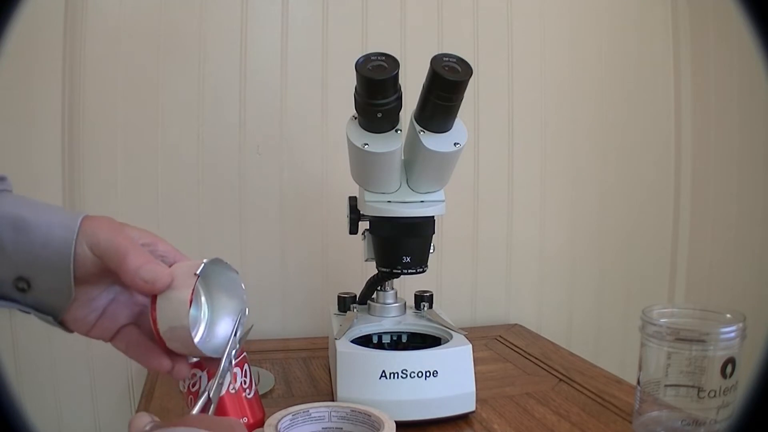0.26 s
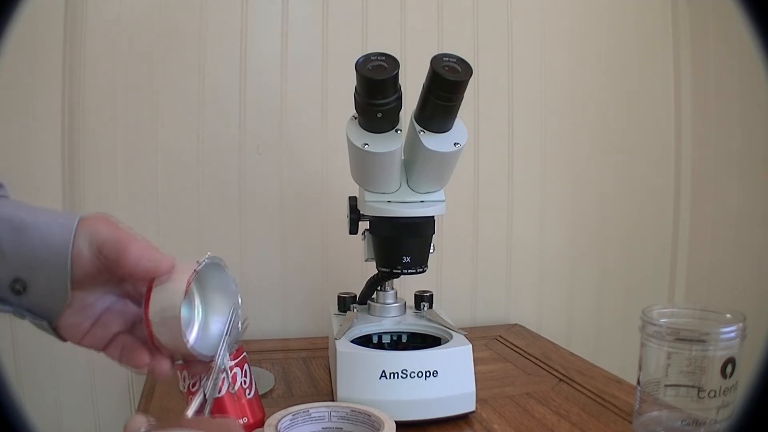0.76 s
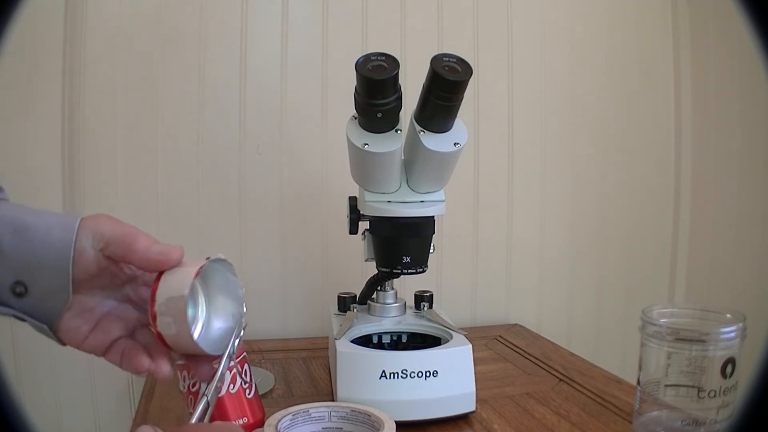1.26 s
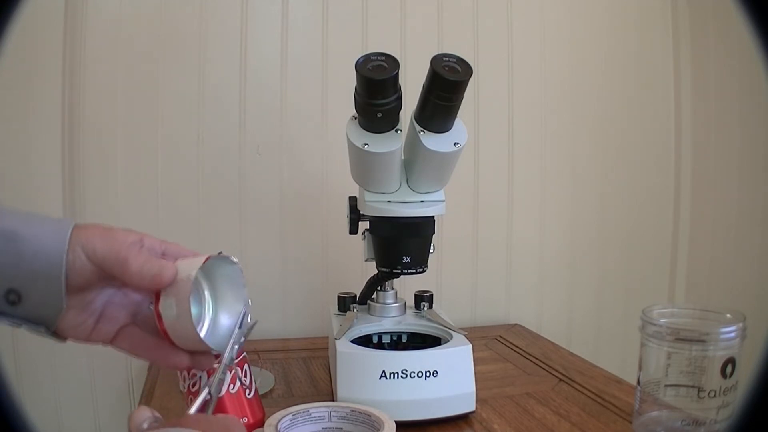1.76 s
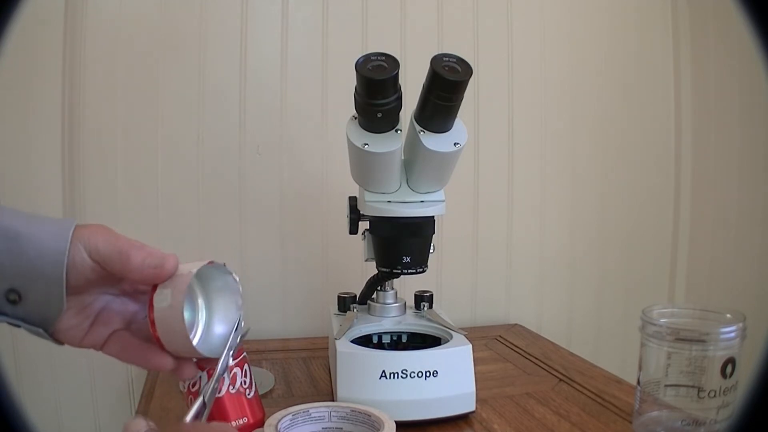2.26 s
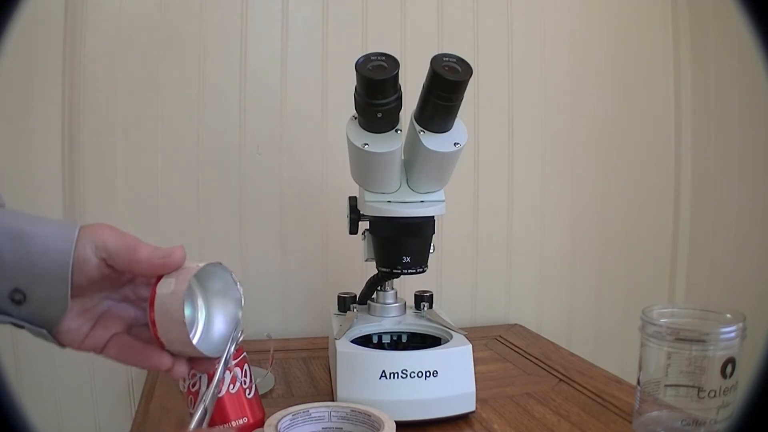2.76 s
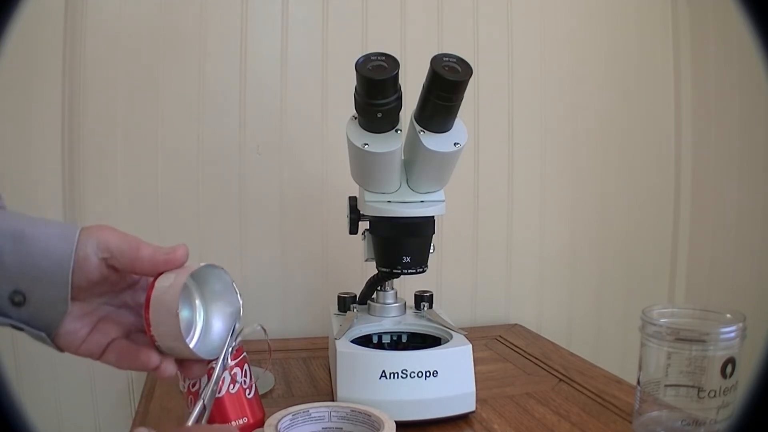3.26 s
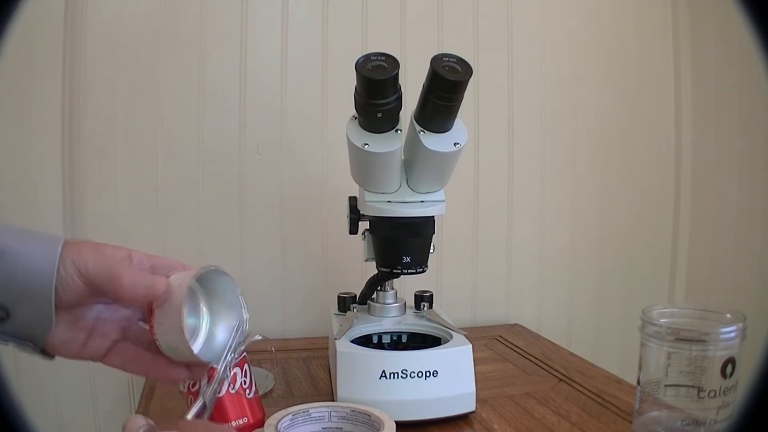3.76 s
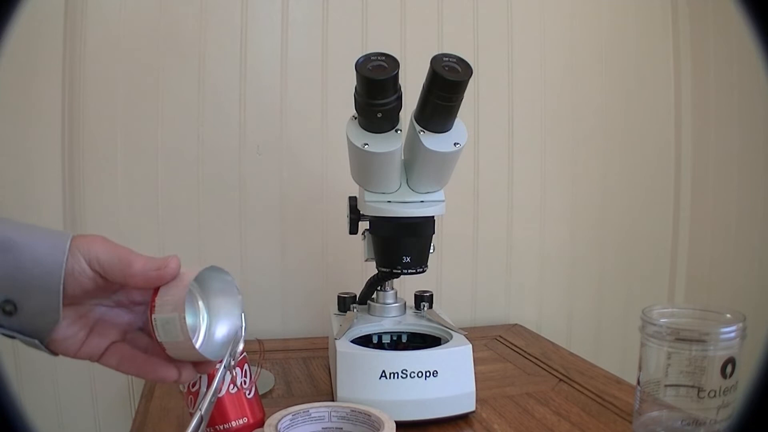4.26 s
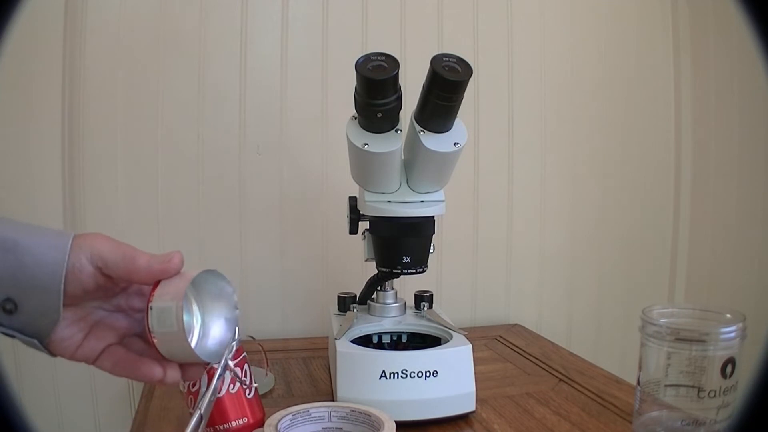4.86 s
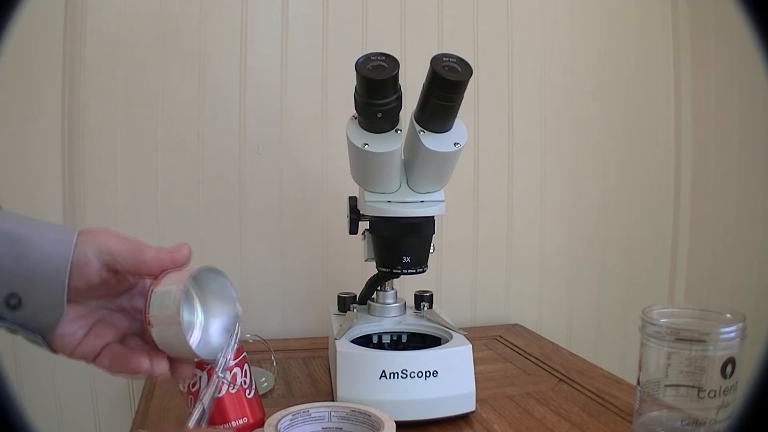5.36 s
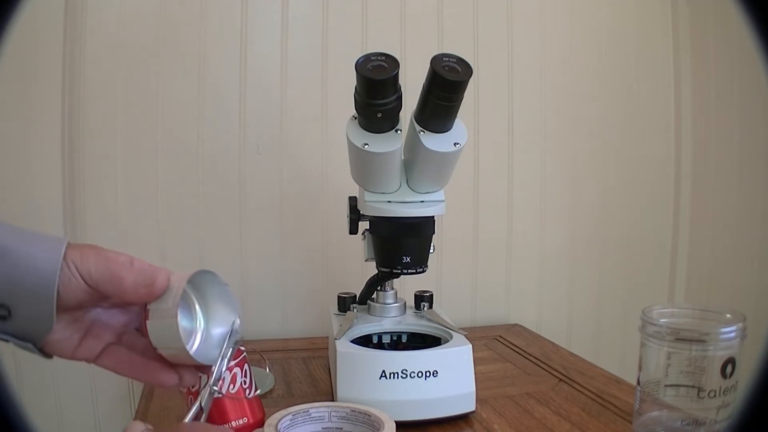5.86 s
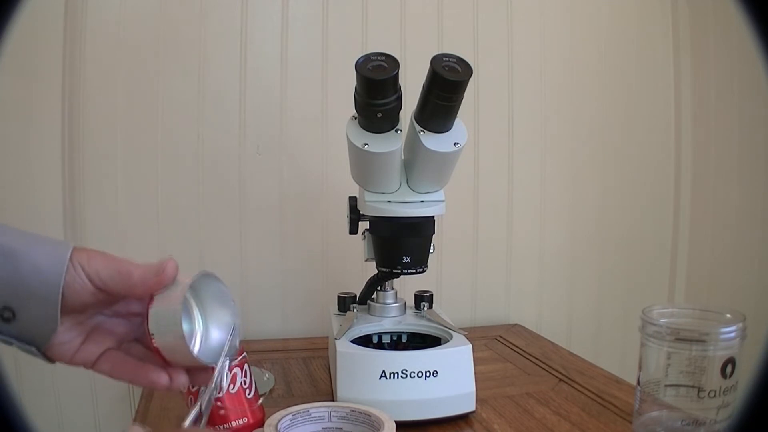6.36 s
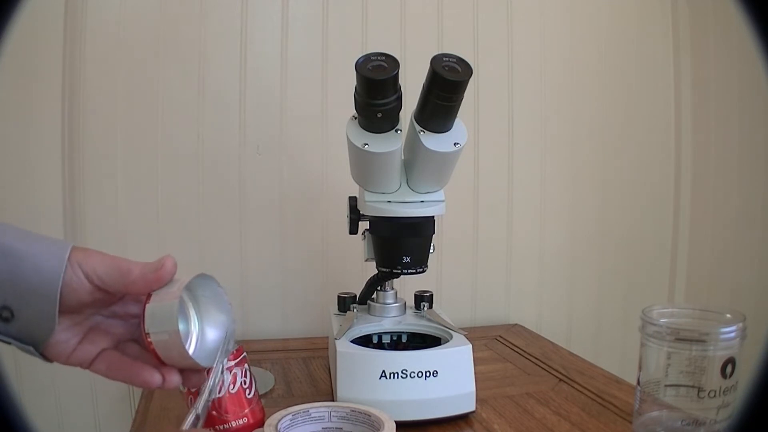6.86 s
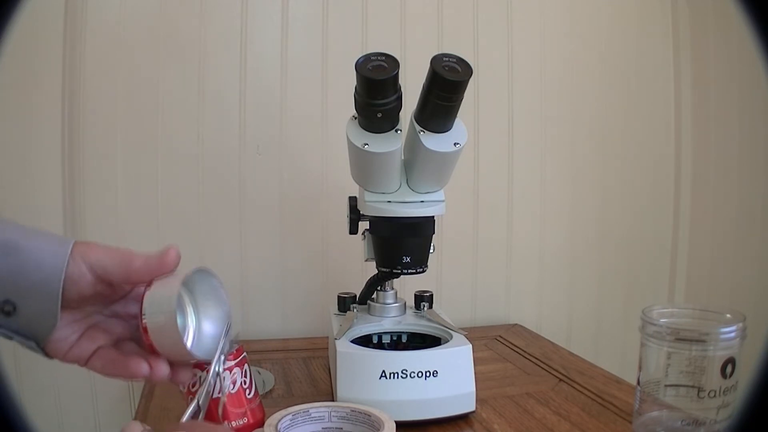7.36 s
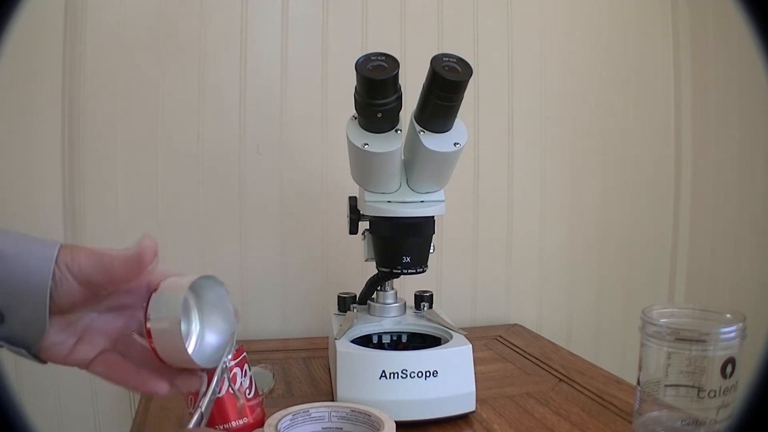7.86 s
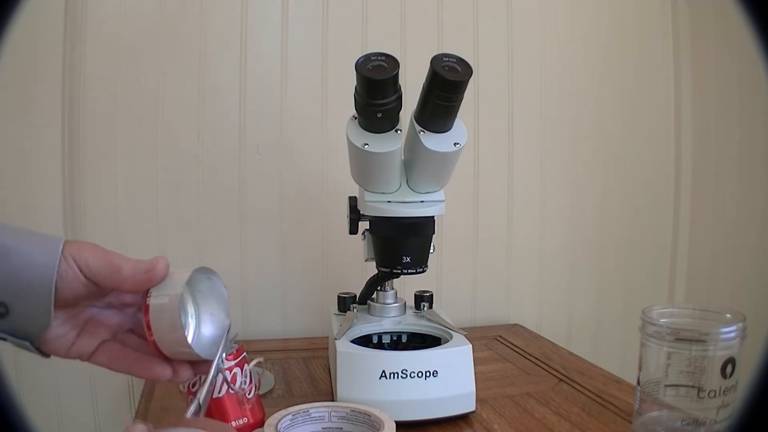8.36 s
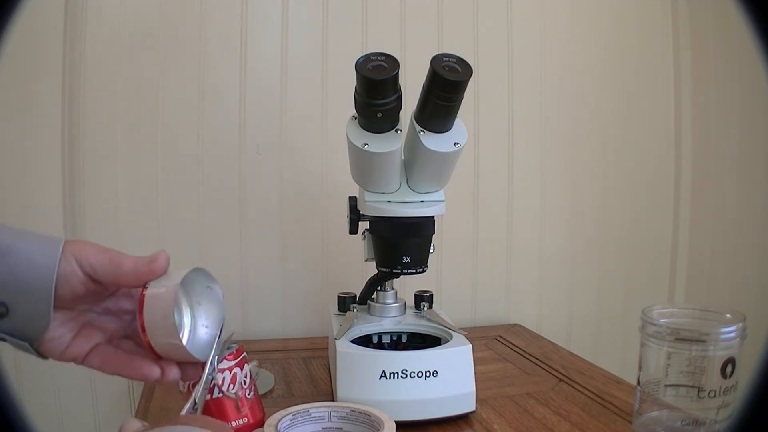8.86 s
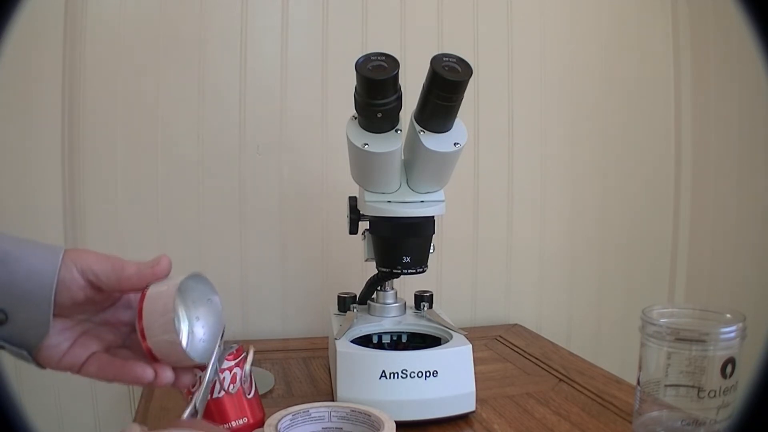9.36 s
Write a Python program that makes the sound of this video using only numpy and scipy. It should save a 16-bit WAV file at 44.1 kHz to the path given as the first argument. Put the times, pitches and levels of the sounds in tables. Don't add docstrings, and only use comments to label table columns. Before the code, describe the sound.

Regular metallic snips tear thin aluminium, the cup-shaped can ringing briefly, with blade scrapes, clicks and bright little snaps over faint hiss.

```python
import sys
import numpy as np
from scipy import signal
from scipy.fft import rfft, irfft
from scipy.io import wavfile
from scipy.ndimage import uniform_filter1d

SR = 44100
rng = np.random.default_rng(int(sys.argv[2]) if len(sys.argv) > 2 else 0)


def generate_wav(signal):
    frames = np.transpose(np.atleast_2d(signal))
    scaled = np.clip(frames, -1, 1) * 32767
    pcm = np.round(scaled).astype(np.int16)
    wavfile.write(sys.argv[1], SR, pcm)


def volts_from_db(level):
    exponent = np.asarray(level, float) / 20
    return 10 ** exponent


N = 423801

# bite_s, tear_length_s, end_force_db, bite_force_db (re end force), bent_mode_hz
CLOSING_STROKES = [(0.104, 0.026, -33.5, -5.5, 3230), (0.751, 0.0097, -27.5, -12, 3190),
                   (1.672, 0.04, -42.5, -6, 3730), (2.319, 0.011, -26.5, -10.5, 3460),
                   (2.938, 0.022, -40, -3, 3910), (3.762, 0.0068, -41, 11.5, 3680),
                   (4.392, 0.038, -41, -13.5, 3800), (4.999, 0.028, -34.5, -3, 3600),
                   (5.742, 0.042, -34, -21, 4060), (6.374, 0.065, -48, 4.5, 3860),
                   (6.975, 0.0021, -63.5, 22.5, 3950), (7.321, 0.017, -35, -18.5, 3940),
                   (8.092, 0.0026, -47.5, 7.5, 4270), (8.716, .014, -35.5, -13.5, 4020),
                   (9.344, 0.032, -44.5, -8.5, 4150)]
# start_s, length_s, start_force_db, end_force_db, bent_mode_hz
OPENING_RUBS = [(0.336, 0.052, -70, -70, 4030), (0.462, 0.16, -60, -69.5, 3880),
                (1.009, 0.25, -71.5, -68.5, 3950), (1.964, 0.052, -57.5, -67, 3720),
                (2.08, 0.1, -61, -57, 4020), (2.466, 0.35, -57.5, -65.5, 4010),
                (3.236, 0.35, -62, -74, 4060), (3.885, 0.073, -50, -80, 4000),
                (4.018, 0.16, -59, -61, 3580), (4.25, 0.042, -54, -55.5, 4900),
                (4.634, .21, -62, -62, 3660), (5.254, 0.17, -60.5, -59.5, 3720),
                (5.512, 0.17, -59, -80, 4070), (5.93, 0.13, -81, -56.5, 4060), (6.085, .04, -48, -62, 4070),
                (6.174, 0.036, -42, -59, 3830), (6.576, 0.086, -75, -64, 3900),
                (7.588, 0.027, -52.5, -71, 4170), (7.62, 0.22, -65, -72, 3960),
                (8.138, 0.15, -63, -75, 4020), (8.39, .22, -62, -73, 4180), (8.979, 0.19, -67.5, -65, 3970)]
# start_s, length_s, start_force_db, end_force_db, bent_mode_hz
TIP_SLIDES = [
    (3.72, 0.033, -83, -60, 3550),
    (6.985, 0.077, -46.5, -71, 3800),
    (7.215, 0.12, -85, -71, 4040),
    (8.052, 0.031, -72, -64, 3830),
]
# mode_hz, width_hz, level_db
CUP_MODES = [(665, 240, -33.5), (1126, 61, -4), (1564, 62, -2), (1660, 240, -5), (1900, 13, -6.5),
             (1954, 117, 6), (2345, 100, -6), (2810, 110, -13), (3420, 270, -7), (3660, 330, -8.5),
             (3989, 196, -2.5), (4390, 460, -9), (6190, 77, -17.5), (7110, 87, -24.5), (8154, 880, -8)]
# freq_hz, density_db (per Hz)
TEAR_COLOUR = [(150, -67), (250, -53.5), (669, -5.5), (1290, -11), (1890, 5.5), (2490, -9), (3280, -12.5),
               (8180, -25), (15500, -47.5)]
# time_s, blow_db, upper_modes_db (re blow), thin_tip_db (re blow)
BRIGHT_SNAPS = [(0.2404, -31, 0, -12), (1.3596, -39, -8, -14), (2.4772, -34.5, -2, -4),
                (2.5028, -27.5, -2, -12), (2.5112, -30.5, -2, -8), (2.5492, -36.5, -5, -8),
                (3.2874, -39, .5, -14), (3.3912, -35, -4, -10), (3.497, -33, -7, -12),
                (3.5199, -34.5, -6, -6), (3.552, -36, -7, -12), (3.7535, -14.5, 3.5, 2),
                (3.8468, -25, -6, -20), (3.872, -25, -19, -9), (4.284, -35.5, 1, -16),
                (5.5131, -30.5, -14, -20), (5.572, -36.5, -2, -1), (5.778, -18.5, -3, 4),
                (6.3734, -20.5, -15, -22), (6.9669, -15, 1.5, -22), (7.155, -45, 4, -18),
                (7.734, -37, -4, -16), (7.7544, -36.5, 5, -18), (7.852, -35, -8, -12),
                (7.9114, -35, -10, 3), (7.9592, -40.5, -9, -1), (8.0666, -43.5, 11, -18),
                (8.087, -11.5, -12.5, -8), (8.3945, -29.5, 0, -14), (8.546, -37, .5, -12)]
BENT_WIDTH_HZ = 380


def evened(x):
    return x / np.sqrt(np.mean(x ** 2, -1, keepdims=True) + 1e-20)


def read(points, hz):
    f, value = np.transpose(points)
    return np.interp(np.log(hz + 1), np.log(f + 1), value)


def air():
    # freq_hz, density_db (per Hz)
    hiss_colour = [(15, -65), (25, -47), (598, -8.5), (722, -10), (826, -7.5), (1110, -9.5), (1340, -9),
                   (1570, -10.5), (2700, -12.5), (12500, -31), (15500, -55)]
    # freq_hz, likeness (-1 to 1)
    likeness = [(60, 0.98), (180, 0.5), (550, 0.43), (1650, 0.5), (4970, 0.82), (15000, 0.93)]
    frames, hz = N // 256 + 5, np.fft.rfftfreq(1024, 1 / SR)
    a, b, c, d, patches = rng.standard_normal((frames, 513, 5)).T
    patches = evened(uniform_filter1d(uniform_filter1d(patches, 10, 0), 12, 1))
    same = np.clip(read(likeness, hz), -1, 1)[:, None]
    left = a + 1j * b
    right = same * left + np.sqrt(1 - same ** 2) * (c + 1j * d)
    spectra = np.array([left, right]) * volts_from_db(read(hiss_colour, hz)[:, None] + 2.2 * patches)
    hiss = signal.istft(spectra, nperseg=1024, noverlap=768)[1][:, :N]
    return volts_from_db(-62) * evened(hiss)


def room(x, apart_db):
    # freq_hz, t60_s
    decay = [(300, 0.6), (1000, 0.37), (3000, 0.32), (8000, 0.31), (14000, 0.15)]
    echoes = np.zeros((2, SR // 2))
    at = np.arange(200, SR // 2 - 20, 16) + rng.integers(0, 16, (2, (SR // 2 - 205) // 16))
    np.put_along_axis(echoes, at, rng.choice([-1., 1.], at.shape), 1)
    hz, t, z = signal.stft(echoes, SR, nperseg=256)
    dying = z * volts_from_db(-60 * t / read(decay, hz)[:, None])
    common, other = signal.istft(dying, SR, nperseg=256)[1]
    tail = common + volts_from_db(apart_db) * other * np.array([[1], [-1]])
    return signal.fftconvolve(x[None], tail / np.linalg.norm(common), axes=1)[:, :N]


def ports(x):
    scatter = rng.standard_normal(600) * np.exp(-np.arange(600) / 450.0)
    scatter = np.r_[np.zeros(20), scatter / np.linalg.norm(scatter)]
    scattered = signal.oaconvolve(x, scatter)[:N] * np.array([[1], [-1]])
    return x * volts_from_db(np.array([[.3], [-.3]])) + volts_from_db(-23.0) * scattered


def rings(modes, colour, crack_db, crack_s, count):
    splits_hz = (1300, 2700, 5200)
    spot_db = 4.
    t, hz = np.arange(2048) / SR, np.fft.rfftfreq(4096, 1 / SR)
    f, width, db = np.transpose(modes)[:, :, None]
    place = rng.standard_normal((count, len(modes), 2))
    detuned = f * (1 + 0.0078 * place[:, :, 1:])
    level = volts_from_db(db + spot_db * place[:, :, :1]) * width
    tone = level * np.exp(-np.pi * width * t) * np.sin(2 * np.pi * detuned * t)
    tone = tone.sum(1) * (1 - np.exp(-t / 0.00082)) ** 2
    crack = rng.standard_normal((count, len(t))) * np.exp(-t / crack_s)
    tone, crack = (rfft(np.pad(x, ((0, 0), (256, 1792)))) for x in (tone, crack))
    both = evened(abs(tone)) * np.exp(1j * np.angle(tone))
    both += volts_from_db(crack_db) * crack * evened(volts_from_db(read(colour, hz))) / np.sqrt(crack_s * SR / 2)
    steps = [0] + [1 / (1 + (hz / edge) ** 10) for edge in splits_hz] + [1]
    parts = [irfft(both * (high - low)) for low, high in zip(steps, steps[1:])]
    return [p / np.sqrt(np.mean(np.sum(p ** 2, 1))) for p in parts]


def excite(trains, parts):
    out = sum(signal.oaconvolve(train, part, axes=1).sum(0) for train, part in zip(trains, parts))
    return out[256:N + 256]


def bend():
    glides = (CLOSING_STROKES, -300), (OPENING_RUBS, 700), (TIP_SLIDES, -1500)
    points = []
    for rows, glide in glides:
        for start, length, _, _, mode_hz in rows:
            for end in (0, 1):
                points.append((start + end * length, mode_hz + (end - .5) * length * glide))
    return np.interp(np.arange(N) / SR, *np.transpose(sorted(points)))


def resonate(x, hz, width):
    turn, r = np.exp(2j * np.pi * np.cumsum(hz) / SR), np.exp(-np.pi * width / SR)
    ring = signal.lfilter([(1 - r) ** 2], [1, -2 * r, r * r], x / turn + 1e-18)
    return 2 * (turn * ring).real * np.sqrt(SR / (np.pi * width))


def ticks():
    # time_s, blow_db, upper_modes_db (re blow)
    buckles = [(.096, -44, -14), (.1057, -34, -12), (.5287, -47.5, 15), (.7446, -20, -6),
               (.7582, -16.5, 8.5), (.7715, -18, -5), (.7806, -12, -10), (1.2183, -45.5, 6),
               (1.6698, -26, -17), (1.8182, -33.5, -8.5), (2.0911, -37, 1.5), (2.3198, -23, -8),
               (2.3327, -28, -7), (2.6317, -26, -12), (3.7864, -7, -34), (4.395, -27, -24),
               (4.6415, -36.5, 4.5), (4.6885, -55, -9), (4.998, -23, 3.5), (5.459, -29.5, -30),
               (5.9787, -26, -11.5), (6.0232, -27, -13), (6.0775, -15, -11.5), (6.167, -15, -12.5),
               (7.3419, -21, 0), (8.532, -51, -4), (8.7165, -29, -3), (8.7278, -24, -14),
               (8.8752, -41.5, -1)]
    # time_s, blow_db, upper_modes_db (re blow)
    taps = [(.347, -50, 10), (.4754, -30, -6.5), (.5906, -48.5, 20), (.9176, -30, -6), (1.3883, -44.5, -3),
            (1.991, -48, 15.5), (2.608, -30.5, -9), (2.7133, -41, -7), (2.9399, -33.5, 8),
            (3.239, -35.5, -1), (4.0552, -27, -15), (4.2503, -29, -11), (4.792, -36, -6),
            (5.2578, -34, -13), (5.7391, -24.5, -12), (5.7469, -20, -6), (5.9244, -41, 5),
            (6.0434, -27, -7), (6.3576, -44, 4), (6.5996, -35.5, -8), (7.321, -33, 6), (7.5778, -32.5, -4),
            (7.593, -39, 0), (7.877, -39, -11), (8.1932, -32, -12), (8.2166, -25.5, -5), (8.303, -36.5, -5),
            (9.3392, -45, -9)]
    # time_s, blow_db
    pricks = [(3.1, -43), (3.308, -43), (3.344, -39), (3.468, -46), (3.597, -45.5), (3.641, -52),
              (3.828, -35), (5.538, -39), (5.619, -52), (5.665, -60), (6.331, -51), (7.859, -42),
              (2.65, -53), (2.835, -49.5), (5.371, -35.5), (9.007, -44.5)]
    parts = rings(CUP_MODES, TEAR_COLOUR, crack_db=1.5, crack_s=.0022, count=6)
    trains = np.zeros((4, 6, N + 1000))
    kinds = (buckles, -20), (taps, -10), (BRIGHT_SNAPS, 1.2)
    blows = [(*row[:3], bright_db) for rows, bright_db in kinds for row in rows]
    blows += [(*row, 1, 4.5) for row in pricks]
    for (s, blow_db, upper_db, bright_db), u in zip(blows, rng.random((len(blows), 12))):
        lag = np.cumsum(np.r_[0, u[1:6]]) * .003
        at = np.round((s + lag) * SR).astype(int)
        size = volts_from_db(blow_db + 4.0 - 1000 * lag) * np.r_[1, .7 * u[6:11]]
        place = (6 * u[:6]).astype(int)
        for k, db in enumerate((-18, 0, upper_db, bright_db)):
            trains[k, place, at] += size * volts_from_db(db)
    bent = resonate(trains[2].sum(0)[:N], bend(), BENT_WIDTH_HZ)
    return excite(trains, parts) + volts_from_db(6.5) * bent


def sparks():
    edge_hz, decay_s = 11000, 0.00078
    t, train = np.arange(400) / SR, np.zeros(N)
    highpass = signal.butter(4, edge_hz, "high", fs=SR, output="sos")
    prick = signal.sosfilt(highpass, rng.standard_normal(400) * np.exp(-t / decay_s))
    s, blow_db, _, tip_db = np.transpose(BRIGHT_SNAPS)
    train[np.round(s * SR).astype(int)] = volts_from_db(blow_db + tip_db)
    return signal.oaconvolve(train, prick / np.linalg.norm(prick))[:N]


def lay(gains, s, force_db, colours_db, edge_s):
    at = np.arange(round(s[0] * SR), min(round(s[-1] * SR), N))
    fade = np.clip(np.minimum(at / SR - s[0], s[-1] - at / SR) / edge_s, 0, 1)
    gains[:, at] += [fade * volts_from_db(np.interp(at / SR, s, force_db + db)) for db in colours_db]


def strokes(gains, parts, slips_per_s, spread_db, clump_db, bent_db, dwell=64):
    clumps = evened(uniform_filter1d(uniform_filter1d(rng.standard_normal(N), 250), 250))
    size = volts_from_db(spread_db * np.minimum(rng.exponential(1, N), 3) + clump_db * clumps)
    slips = evened(size * (rng.random(N) < slips_per_s / SR))
    spot = np.repeat(rng.integers(0, len(parts[0]), N // dwell + 1), dwell)[:N]
    place = spot == np.arange(len(parts[0]))[:, None]
    bent = resonate(gains[2] * slips, bend(), BENT_WIDTH_HZ)
    return excite([gain * slips * place for gain in gains], parts) + volts_from_db(bent_db) * bent


def drag_force():
    land_s, lift_s, land_db, lift_db = 0.024, 0.031, -17, -15
    gains = np.zeros((4, N))
    for rows, more_upper_db, more_bright_db in ((OPENING_RUBS, 0, 0), (TIP_SLIDES, 8, -8)):
        for start, length, first_db, last_db, _ in rows:
            s = start + np.array([-land_s, 0, length, length + lift_s])
            force_db = np.array([first_db + land_db, first_db, last_db, last_db + lift_db])
            over_db = force_db[[1, 1, 2, 2]] + 62
            upper_db = 0.55 - 0.35 * over_db + more_upper_db
            bright_db = -3.1 - 0.63 * over_db + more_bright_db
            lay(gains, s, force_db, (-19, 0, upper_db, bright_db), edge_s=0.0043)
    return gains


def drag():
    # mode_hz, width_hz, level_db
    rim_modes = [(1536, 30, -30), (1730, 540, 12.5), (1966, 12.6, 8.5), (3550, 370, 0), (3980, 87, -6),
                 (5760, 200, -14), (7800, 350, -20), (6910, 98, -6.5), (7710, 770, 5)]
    # freq_hz, density_db (per Hz)
    rub_colour = [(410, -22.5), (700, -14), (1950, -3), (2950, -46.5), (3970, -17), (8210, -25.5),
                  (12300, -38), (15500, -43)]
    rim = rings(rim_modes, rub_colour, crack_db=1.5, crack_s=0.0034, count=8)
    return strokes(drag_force(), rim, slips_per_s=2200, spread_db=2.5, clump_db=5.0, bent_db=1.0, dwell=300)


def shear_force():
    close_s, hold_s, let_go_s = 0.027, 0.017, 0.076
    touch_db, rest_db = -74.5, -77.5
    upper_db = np.array([2, 2, -2.5, -2.5, 10])
    gains = np.zeros((4, N))
    for bite, tear, end_db, bite_db, _ in CLOSING_STROKES:
        s = bite + np.cumsum([-close_s, close_s, tear, hold_s, let_go_s])
        force_db = np.array([touch_db, end_db + bite_db, end_db, end_db, rest_db])
        over_db = force_db[[1, 1, 2, 3, 4]] + 45
        flex_db, bright_db = -7 - 0.47 * over_db, -5.5 - 0.59 * over_db
        lay(gains, s, force_db, (flex_db, 0, upper_db, bright_db), edge_s=0.019)
    return gains


def shear():
    cup = rings(CUP_MODES, TEAR_COLOUR, crack_db=-1.5, crack_s=0.0056, count=6)
    return strokes(shear_force(), cup, slips_per_s=3200, spread_db=3.0, clump_db=2.5, bent_db=-2.0)


def scene():
    can = volts_from_db(-1) * shear() + volts_from_db(1.0) * drag() + ticks() + sparks()
    return ports(can) + volts_from_db(-8.5) * room(can, apart_db=-18.0) + air()


def roll_off(x):
    return signal.sosfilt(signal.butter(12, 15710, fs=SR, output="sos"), x)


def record(dry):
    heard = signal.sosfilt(signal.butter(3, 225, "high", fs=SR, output="sos"), dry)
    heard = signal.sosfilt(signal.butter(6, 13000, "low", fs=SR, output="sos"), heard)
    return roll_off(heard)


dry = scene()
out = record(dry)
generate_wav(out)
```